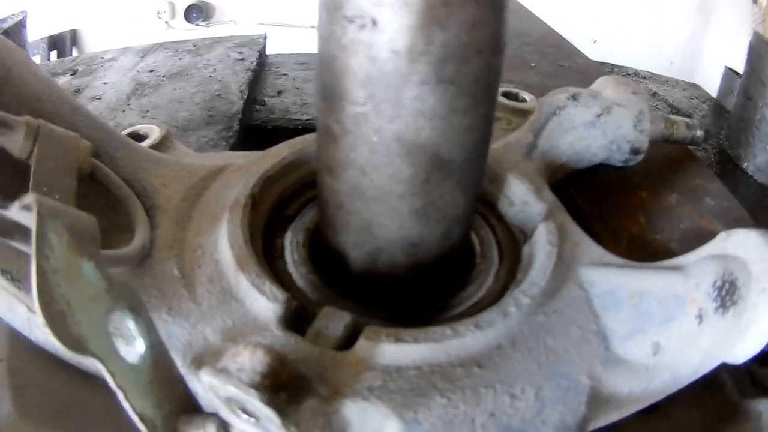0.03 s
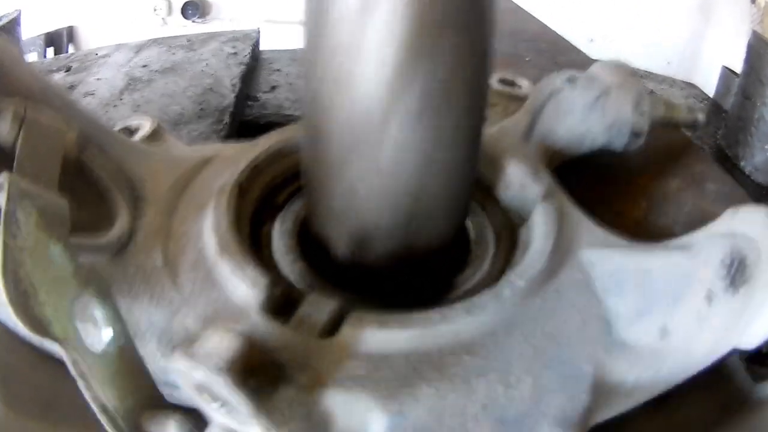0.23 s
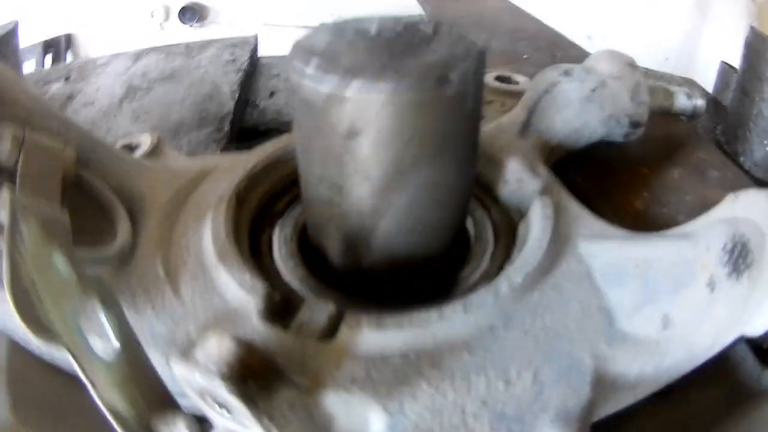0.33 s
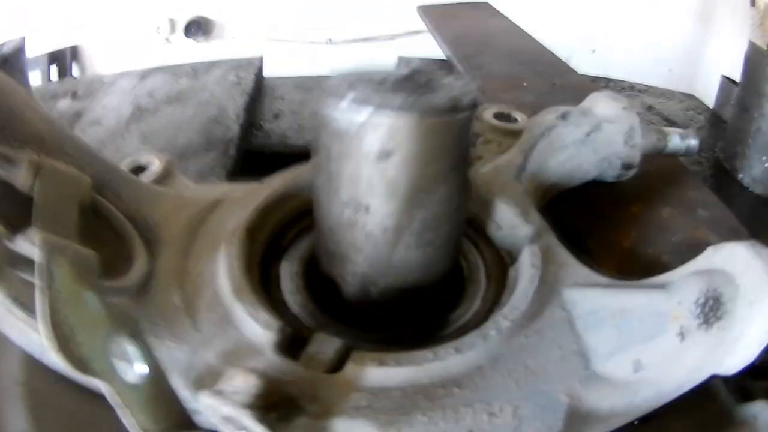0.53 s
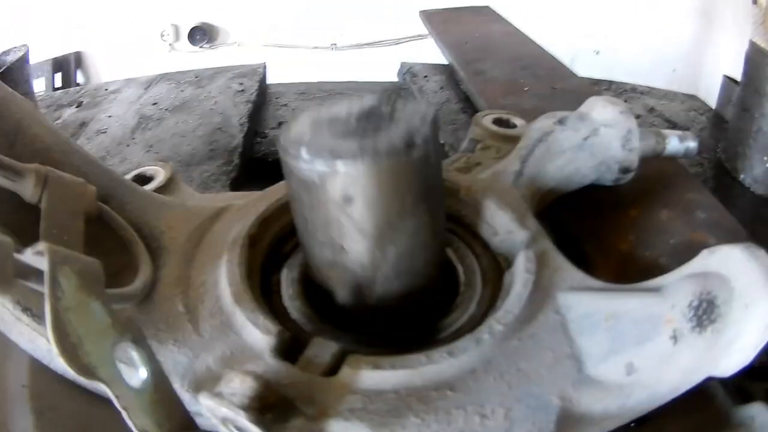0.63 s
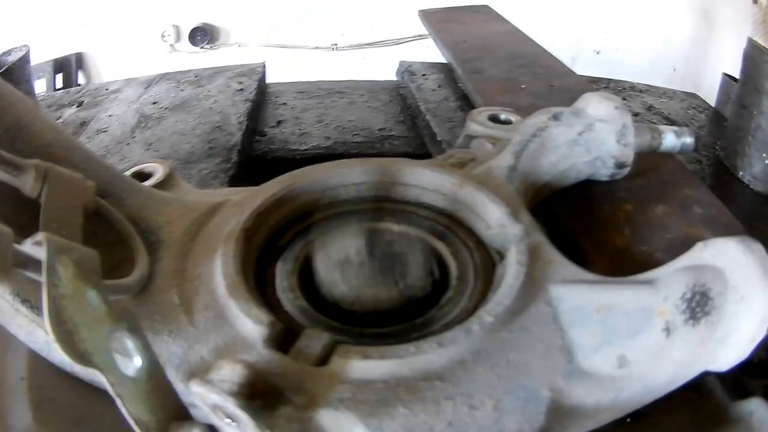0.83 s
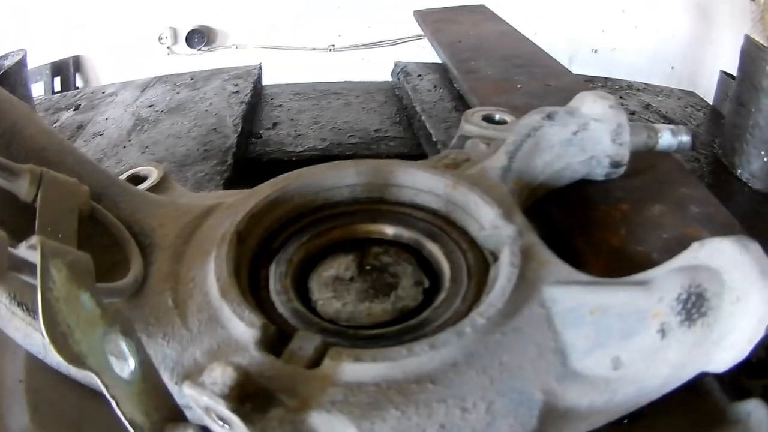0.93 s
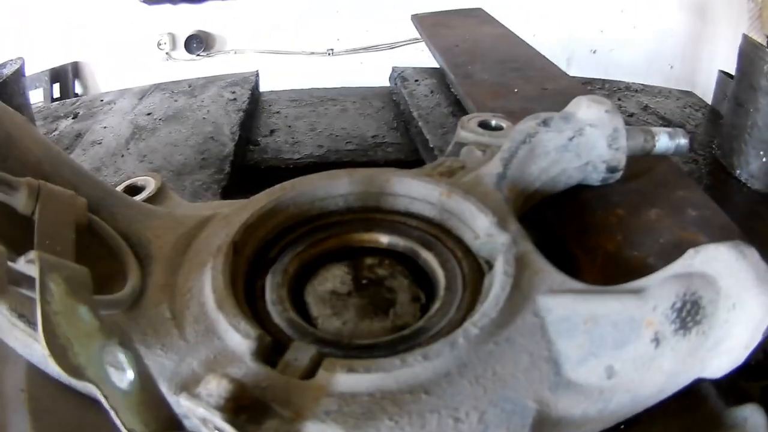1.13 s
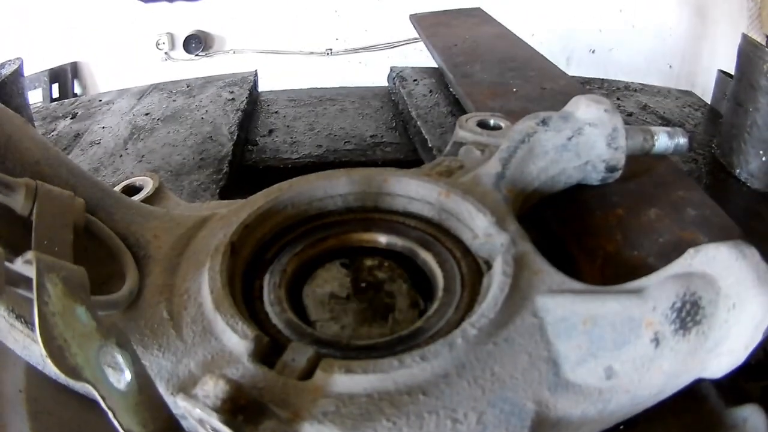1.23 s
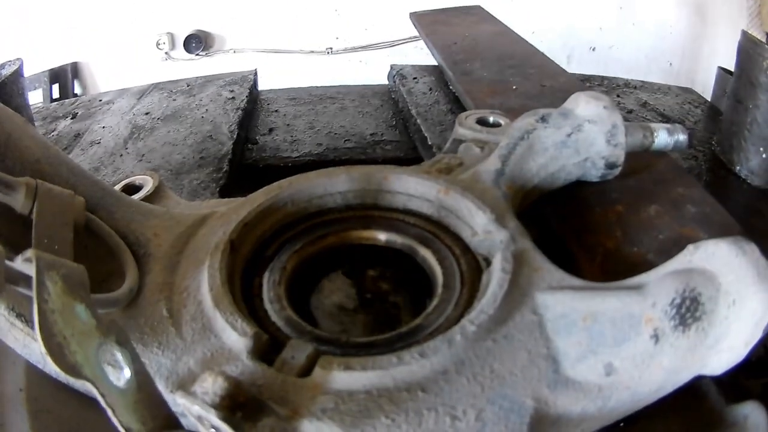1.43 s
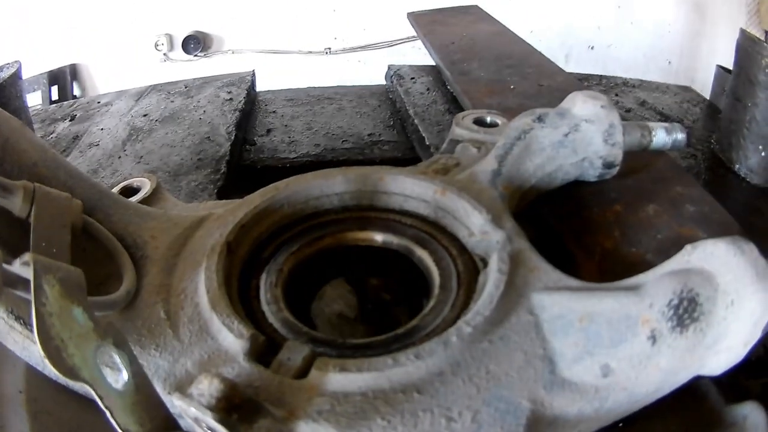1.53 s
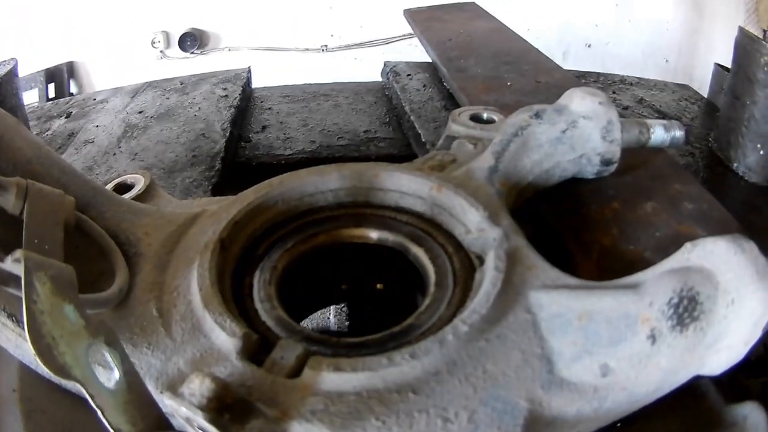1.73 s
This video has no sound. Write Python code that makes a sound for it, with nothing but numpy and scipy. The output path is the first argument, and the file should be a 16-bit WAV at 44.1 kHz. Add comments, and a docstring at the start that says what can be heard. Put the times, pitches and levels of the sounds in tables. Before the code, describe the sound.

Heavy steel slug clangs down into a cast metal housing, rattles and snaps over motor hum

```python
"""A workshop, by the press: a steel drift drops into a cast housing and rattles; a loose hub snaps on its seat.
A motor hums in wavering shaft orders over broad, patchy machine noise, and the room answers faintly.
Blows, slips and snaps ring decaying modes of the metal, with noise for the dense clang, crack and scraping.
The small camera's microphone clips the loud blows, colours the sound and adds a faint hiss."""
import sys
import numpy as np
from scipy import signal
from scipy.fft import rfft, irfft, next_fast_len
from scipy.io import wavfile
from scipy.ndimage import uniform_filter1d, map_coordinates

SR = 44100
rng = np.random.default_rng(int(sys.argv[2]) if len(sys.argv) > 2 else 0)


def waveform_to_disk(signal):
    """Save audio, clipped to [-1, 1], as 16-bit WAV at the path in sys.argv[1]."""
    frames = np.transpose(np.atleast_2d(signal))
    scaled = np.clip(frames, -1, 1) * 32767
    samples = np.round(scaled).astype(np.int16)
    wavfile.write(sys.argv[1], SR, samples)


def magnitude_from_level(level_db):
    """Linear magnitude for a level in decibels (20 dB per decade)."""
    exponent = np.asarray(level_db, float) / 20
    return 10 ** exponent


N = 79380  # samples, 1.8 s


def unit(x):
    """Scale to rms 1."""
    return x / np.sqrt(np.mean(x ** 2) + 1e-20)


def along(points, hz):
    """Read a curve of (Hz, value) points on a log frequency axis."""
    f, v = np.transpose(points)
    return np.interp(np.log(hz + 1), np.log(f + 1), v)


def wobble(rate):
    """A smooth random curve, rate knots a second."""
    knots = rng.standard_normal(int(N * rate / SR) + 4)
    return map_coordinates(knots, [np.arange(N) * rate / SR])


def filtered(x, response):
    """Multiply the spectrum of x by a complex response of frequency."""
    n = x.shape[-1]
    m = next_fast_len(n + 8192)
    return irfft(rfft(x, m) * response(np.fft.rfftfreq(m, 1 / SR)), m)[..., :n]


def dying(t60s, size, spectrum=((1, 0),)):
    """Noise of energy 1 whose every band dies at its own speed."""
    hz, t, z = signal.stft(rng.standard_normal(size), SR, nperseg=256)
    start_db = along(spectrum, hz)[:, None]
    decay_db = 60 * t / along(t60s, hz)[:, None]
    tail = signal.istft(z * magnitude_from_level(start_db - decay_db), SR, nperseg=256)[1][:size]
    return tail / np.linalg.norm(tail)


def ring(pitches_hz, modes, t, scatter_db, lift_db=0, blur_hz=6.9):
    """Decaying modes, randomly stronger or weaker each time; loose contact smears each over blur_hz."""
    attack_s = 0.00019  # time constant
    hz = np.c_[pitches_hz]
    db, t60 = np.transpose(modes)[:, :, None]
    # the phase takes a random step, held for 8 samples
    steps = np.repeat(rng.standard_normal((len(hz), len(t) // 8 + 1)), 8, axis=1)[:, :len(t)]
    phase = np.cumsum(steps, axis=1) * np.sqrt(2 * np.pi * blur_hz / SR / 8)
    strength_db = db + lift_db + rng.normal(0, 1, hz.shape) * scatter_db
    tones = magnitude_from_level(strength_db - 60 * t / t60) * np.sin(2 * np.pi * hz * t + phase)
    return tones.sum(axis=0) * (1 - np.exp(-t / attack_s))


def contact(x, bass_hz, treble_hz):
    """A light contact drives little bass, a soft one little treble."""
    return filtered(x, lambda f: (1j * f / (bass_hz + 1j * f)) ** 2 / (1 + 1j * f / treble_hz) ** 3)


# motor tones: shaft_order, level_db (rms, before wavering)
MOTOR_ORDERS = [(3, -60), (4, -61.5), (5, -59), (6, -64.5), (8, -57.5), (11, -84.5), (13, -57.5), (14, -62),
                (20, -58), (23, -61.5), (37, -61), (49, -70), (51, -60.5), (55, -61)]
# spectrum of the machine noise: pitch_hz, level_db (relative, per Hz)
MACHINE_SPECTRUM = [(25, -41), (45, -27), (105, -3), (140, -3.5), (300, -2), (450, -7.5), (900, -9.5),
                    (1050, -13.5), (2400, -33), (3300, -47), (4500, -49.5), (7000, -72.5)]


def motor():
    """Wavering multiples of the shaft speed and a whine over patchy noise; uneven turning blurs high orders."""
    shaft_hz, wander_turns = 16.63, 0.0047
    waver_db, whine_waver_db = 2.3, 1.5
    noise_db, patchy_db = -47.5, 0.5
    t = np.arange(N) / SR
    turned_s = t + wander_turns / shaft_hz * wobble(12)
    lines = [(order * shaft_hz, db, waver_db) for order, db in MOTOR_ORDERS]
    lines.append((2651, -75.5, whine_waver_db))  # the whine: Hz, dB rms
    tones = np.zeros(N)
    for hz, db, waver in lines:
        level = np.sqrt(2) * magnitude_from_level(db + waver * wobble(7.9))
        tones += level * np.sin(2 * np.pi * (hz * turned_s + rng.random()))
    # patches: noise levels smoothed over neighbouring bands and frames
    z = signal.stft(rng.standard_normal(N), nperseg=1024)[2]
    patches = uniform_filter1d(rng.standard_normal(z.shape), size=5, axis=0)
    patches = uniform_filter1d(patches, size=5, axis=1)
    noise = signal.istft(z * magnitude_from_level(patchy_db * unit(patches)), nperseg=1024)[1][:N]
    noise = filtered(noise, lambda hz: magnitude_from_level(along(MACHINE_SPECTRUM, hz)))
    return tones + magnitude_from_level(noise_db) * unit(noise)


# decay of the workshop: pitch_hz, t60_s
ROOM_DECAY = [(100, 1), (1000, 1), (4000, 0.24), (8000, 0.62)]


def room(x):
    """The workshop's late answer: x smeared by a delayed tail of dying noise."""
    level_db, delay_s = -16.5, 0.008
    late = np.pad(x, (round(delay_s * SR), 0))
    return magnitude_from_level(level_db) * signal.fftconvolve(late, dying(ROOM_DECAY, size=SR // 2))[:N]


# drift mode pitches: pitch_hz
DRIFT_PITCHES = [1480, 2103, 2146, 2900, 3122, 3332, 3610, 4090, 4330, 4694, 5745, 6370, 6500, 7300, 9100]
# drift modes, in the order of those pitches: level_db (relative), t60_s
DRIFT_MODES = [(-12, .1), (2, .2), (-2, .22), (-2, .02), (-13, .06), (-18, .05), (-15, .12), (-10, .09),
               (-14, .12), (-10, .16), (-14, .07), (-25, 0.078), (-22, 0.014), (-38.5, .04), (-34.5, 0.27)]
# decay of the dense ring of housing and bed: pitch_hz, t60_s
DENSE_DECAY = [(100, 0.35), (500, 0.25), (1500, 0.1), (3000, 0.11), (7000, 0.032)]
# drift scraping in the bore, a curve through: time_s, level_db (of the smallest slips)
SCRAPE_LEVEL = [(.18, -120), (0.201, -69.5), (0.299, -79), (0.409, -85.5), (.46, -72), (0.562, -85),
                (0.612, -88), (.63, -68.5), (.68, -71), (.72, -74), (.78, -58), (0.869, -76), (.92, -120),
                (1.319, -120), (1.33, -58.5), (1.37, -92), (1.419, -120)]


def scrape():
    """Small uneven slips of the drift in the bore ring its modes and a short rough tail."""
    slips_per_s, spread_db, rough_db = 500, 2.2, 9
    t = np.arange(SR // 4) / SR
    happens = rng.random(N) < slips_per_s / SR
    sizes = magnitude_from_level(spread_db * rng.exponential(1, N)) * rng.choice([-1, 1], N)
    level_db = np.interp(np.arange(N) / SR, *np.transpose(SCRAPE_LEVEL))
    slips = happens * sizes * magnitude_from_level(level_db)
    rough = magnitude_from_level(rough_db) * contact(dying(DENSE_DECAY, size=len(t)), 2000, 8800)
    body = ring(DRIFT_PITCHES, DRIFT_MODES, t, scatter_db=0) + rough
    return signal.fftconvolve(slips, body)[:N]


# hub mode pitches: pitch_hz
HUB_PITCHES = [1063, 1447, 1400, 2700, 3978, 3988, 4694, 5136, 5790, 6640, 8500, 11400]
# hub modes, in the order of those pitches: level_db (relative), t60_s
HUB_MODES = [(-14.5, 0.15), (-16, 0.12), (7, 0.0056), (-21, 0.031), (-29, .25), (-35, .5), (-68.5, 0.24),
             (-43, 0.36), (-45, 0.5), (-54, 0.14), (-64.5, .1), (-52, 0.085)]
# spectrum of the dense ring of housing and bed: pitch_hz, level_db (relative, per Hz)
DENSE_SPECTRUM = [(60, 1.5), (200, -5), (600, 2), (1600, 7), (2600, -4), (3300, -16.5), (4500, -8.5),
                  (7500, -13), (12000, -26)]
# hub snapping on its seat: start_s, level_db (relative), treble_edge_hz, thin_tones_db (lift)
HUB_SNAPS = [(0.7805, -10.5, 2800, -5), (0.8469, -26.5, 3900, 11), (0.86, -18, 2500, -6.5),
             (.873, -25.5, 2010, 2), (0.881, -32, 2020, -16), (1.7015, -21, 3050, 5),
             (1.7153, -33, 2000, -15)]


def hub():
    """A dry snap: hub modes with a few long thin tones, plus the dense ring of the seat under it."""
    thin_above_hz, seat_db = 3500, 5
    out, t = np.zeros(N + SR), np.arange(SR // 2) / SR
    for start_s, level_db, treble_hz, thin_db in HUB_SNAPS:
        lift_db = thin_db * (np.c_[HUB_PITCHES] > thin_above_hz)
        tones = ring(HUB_PITCHES, HUB_MODES, t, scatter_db=1, lift_db=lift_db, blur_hz=0)
        seat = magnitude_from_level(seat_db) * dying(DENSE_DECAY, size=len(t), spectrum=DENSE_SPECTRUM)
        snap = magnitude_from_level(level_db) * contact(tones + seat, 550, treble_hz)
        out[round(start_s * SR):][:len(t)] -= snap
    return out[:N]


# low pushes as the bed takes the weight: start_s, level_db (relative), pitch_hz
BED_THUMPS = [(0.207, -20.5, 200), (0.2133, -17.5, 346), (0.257, -8, 300), (0.4696, -32.5, 357)]


def bed():
    """Low pushes as the bed takes the weight: a cosine that swells and dies in about a cycle."""
    cycles = 1.15
    out, t = np.zeros(N + SR), np.arange(SR // 2) / SR
    for start_s, level_db, hz in BED_THUMPS:
        swell = hz * t * np.exp(1 - 2 * hz * t / cycles)
        out[round(start_s * SR):][:len(t)] -= magnitude_from_level(level_db) * swell * np.cos(2 * np.pi * hz * t)
    return out[:N]


# housing mode pitches: pitch_hz
HOUSING_PITCHES = [218, 321, 440, 528, 604, 692, 860, 1044, 1150, 1220, 1615, 1924, 3118, 3240, 4685, 5105,
                   6118]
# housing modes, in the order of those pitches: level_db (relative), t60_s
HOUSING_MODES = [(-8, 0.45), (-8.5, 0.086), (-9, 0.33), (-3, 0.3), (-13, 0.3), (-7, 0.11), (-6, 0.22),
                 (-10, .25), (-13, .25), (0, 0.12), (2.5, 0.071), (-8.5, 0.14), (-4, .1), (-8, .08),
                 (-16, .14), (-19, .2), (-20, .12)]
# drift against housing: start_s, housing_level_db, drift_level_db (both relative), bass_edge_hz, treble_edge_hz
DRIFT_BLOWS = [(0.2119, -23.5, -40.5, 80, 1200), (0.2155, -25, -49, 288, 2090),
               (.2205, -27, -48, 402, 1640), (0.2246, -36.5, -50, 500, 1200), (0.2559, -21, -46, 50, 500),
               (.2615, -24, -50, 300, 4000), (.2665, -26, -40, 900, 4000), (.2715, -29.5, -45, 900, 4000),
               (0.2754, -33.5, -32.5, 900, 3000), (.293, -35.5, -50, 2000, 4000),
               (0.419, -43.5, -52.5, 1500, 3500), (.4515, -39, -61, 2000, 3500),
               (0.4692, -30, -45, 100, 1500), (0.472, -48.5, -34, 800, 4070),
               (0.478, -37.5, -59.5, 600, 2020), (.601, -76, -54.5, 4500, 6000),
               (0.63, -48, -65, 1500, 4000), (0.652, -43, -71, 1980, 3950), (0.6928, -39, -63, 2200, 4000),
               (0.7039, -49, -45, 2200, 4000), (0.7148, -36.5, -57.5, 2200, 4000),
               (0.7371, -39, -47.5, 2200, 4000), (0.7567, -39.5, -51, 2170, 5000),
               (.780, -32, -31, 900, 5040), (0.821, -37.5, -44, 1200, 4860), (.838, -68, -41, 1500, 5000),
               (0.871, -47, -47.5, 1500, 5070), (1.3275, -50.5, -48.5, 700, 4500),
               (1.343, -57, -58, 1200, 5460), (1.494, -79, -63.5, 3020, 4970), (1.593, -71, -63, 700, 6000)]


def housing():
    """Each blow rings housing and drift modes, with a dense clang and a short noise crack."""
    scatter_db, clang_db = 2.5, 32.5
    crack_db, crack_t60_s = -10.5, 0.0018
    out, t = np.zeros(N + SR), np.arange(SR // 2) / SR
    for start_s, housing_db, drift_db, bass_hz, treble_hz in DRIFT_BLOWS:
        clang = magnitude_from_level(clang_db) * dying(DENSE_DECAY, size=len(t), spectrum=DENSE_SPECTRUM)
        crack = magnitude_from_level(crack_db - 60 * t / crack_t60_s) * rng.standard_normal(len(t))
        cast = magnitude_from_level(housing_db) * (ring(HOUSING_PITCHES, HOUSING_MODES, t, scatter_db) + clang)
        steel = magnitude_from_level(drift_db) * (ring(DRIFT_PITCHES, DRIFT_MODES, t, scatter_db) + crack)
        out[round(start_s * SR):][:len(t)] += contact(cast + steel, bass_hz, treble_hz)
    return out[:N]


def scene():
    """The metal, the room's answer to it, and the motor, in one channel."""
    metal = housing() + bed() + scrape() + hub()
    return (metal + room(metal) + motor())[None]


# microphone colour: pitch_hz, level_db
MIC_COLOUR = [(30, -20.5), (44, -2.5), (5000, 1.5), (7000, 1.5), (7600, -3), (8000, -42.5), (8400, 2.5),
              (9000, -0.5), (12000, 2.5), (13300, -1), (14400, -17.5), (15500, -5)]


def microphone(dry):
    """The small camera's microphone: loud peaks bend hard against a ceiling, then its colour is applied."""
    ceiling, hardness = 0.178, 14
    clipped = dry / (1 + np.abs(dry / ceiling) ** hardness) ** (1 / hardness)
    edge = SR // 20  # mirrored ends keep the filter from wrapping
    padded = np.pad(clipped, [(0, 0), (edge, edge)], "reflect")
    return filtered(padded, lambda hz: magnitude_from_level(along(MIC_COLOUR, hz)))[:, edge:-edge]


def low_pass(x):
    """Removes everything above the highest recorded frequency."""
    return signal.sosfilt(signal.butter(12, 15660, fs=SR, output="sos"), x)


def record(dry):
    """The microphone, a brief fade-in and faint hiss."""
    fade_in_s, hiss_db = 0.003, -93
    heard = microphone(dry) * np.minimum(np.arange(N) / (fade_in_s * SR), 1)
    mix = heard + magnitude_from_level(hiss_db) * rng.standard_normal(heard.shape)
    return low_pass(mix)


dry = scene()
out = record(dry)
waveform_to_disk(out)
```